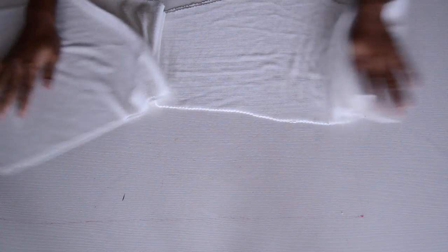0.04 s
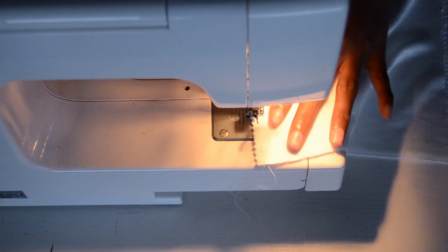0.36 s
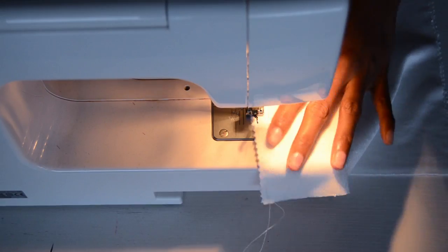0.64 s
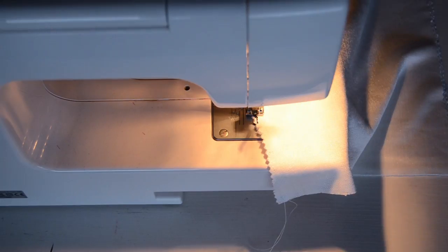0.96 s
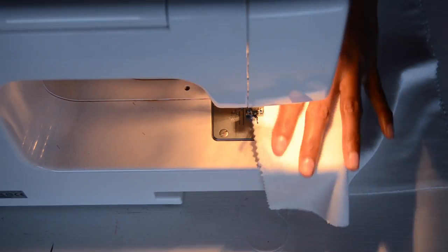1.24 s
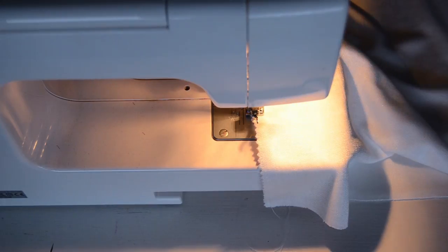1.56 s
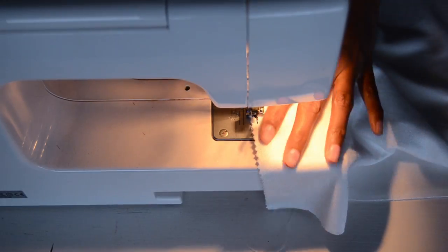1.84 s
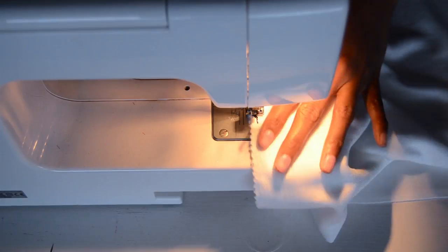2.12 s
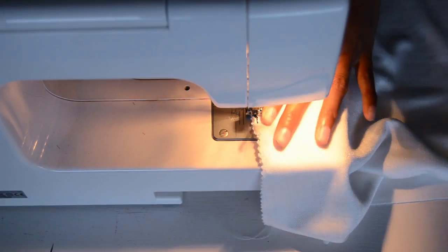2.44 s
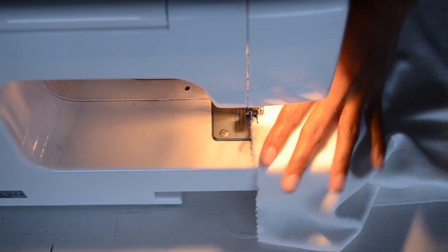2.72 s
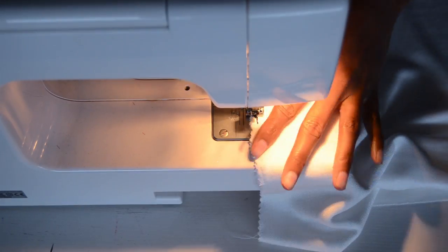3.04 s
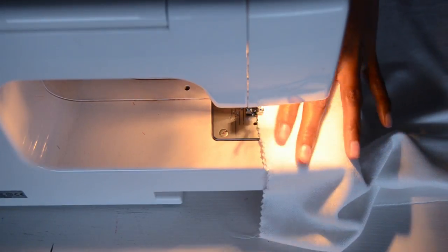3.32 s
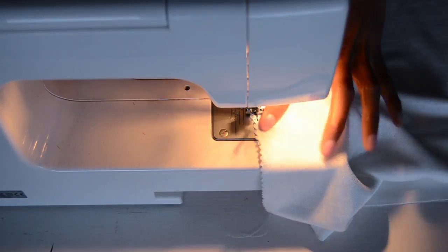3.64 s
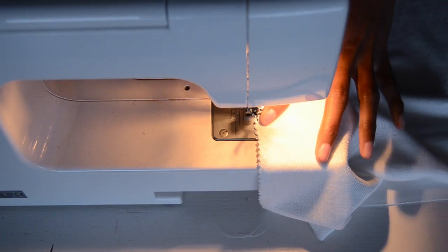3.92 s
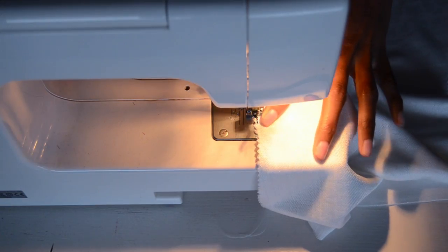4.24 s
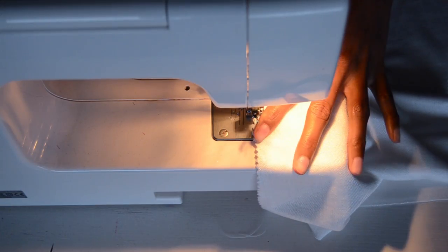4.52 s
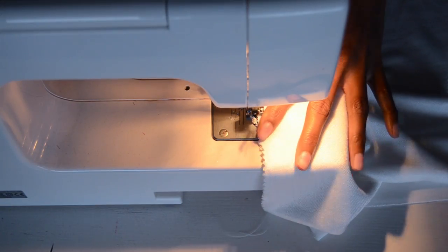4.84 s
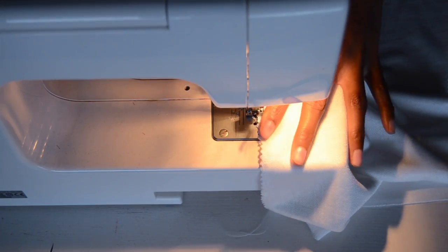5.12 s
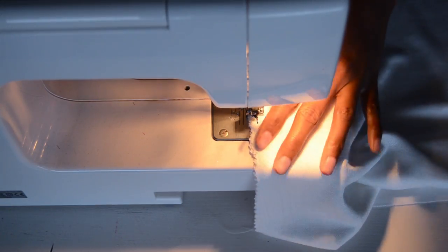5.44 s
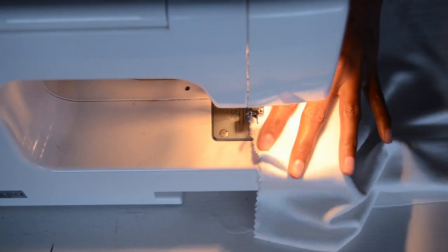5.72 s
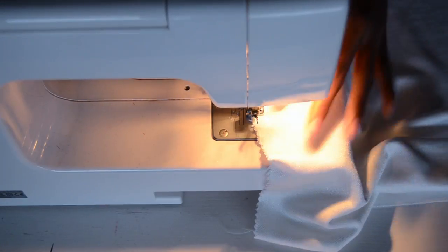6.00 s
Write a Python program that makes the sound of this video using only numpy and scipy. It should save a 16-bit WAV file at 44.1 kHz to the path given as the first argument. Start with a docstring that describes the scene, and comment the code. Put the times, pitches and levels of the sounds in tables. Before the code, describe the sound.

Close, dry swishes of cloth pushed across a tabletop come in two runs, with light snapping folds and faint finger crackle between.

```python
"""You hear stretchy fabric swish over a table in short strokes, up close, in a small dry room.
Each stroke is a swarm of tiny clicks from slipping threads, and the table rings softly underneath.
Between strokes, folds tick and snap as they let go, and the resting fingers make a faint crackle.
A soft boom and dull room noise open the scene; from the first stroke on, the background is
a faint hiss with a thin electrical whine and a low hum."""
import sys
import numpy as np
from scipy import signal
from scipy.fft import rfft, irfft
from scipy.io import wavfile

SR = 44100
rng = np.random.default_rng(int(sys.argv[2]) if len(sys.argv) > 2 else 0)


def generate_wav(signal):
    """Clip the signal to [-1, 1] and save it as 16-bit WAV at the path in sys.argv[1]."""
    frames = np.transpose(np.atleast_2d(signal))
    scaled = np.clip(frames, -1, 1) * 32767
    pcm = np.round(scaled).astype(np.int16)
    wavfile.write(sys.argv[1], SR, pcm)


N = 276418
TIME = np.arange(N) / SR

# pushes of the hand: start/s, length/s, relative level at full speed/dB, quieter on landing by/dB,
# speeding up/s, quieter on lifting by/dB, slowing down/s
STROKES = [(0.405, 0.17, -22.5, 5, 0.074, 16.5, 0.07), (0.576, 0.21, -22.4, 10.5, 0.087, 20.5, 0.061),
           (1.105, 0.28, -22.5, 10.5, 0.12, 16, 0.07), (1.858, 0.22, -23, 10, 0.098, 18.5, 0.065),
           (2.102, 0.4, -22.5, 9.5, 0.11, 22.5, 0.089), (2.588, 0.24, -23.1, 9.5, 0.092, 21.5, 0.071),
           (2.991, 0.14, -23.5, 9, 0.098, 17, 0.066), (4.79, 0.11, -19.5, 16.5, 0.081, 23.5, 0.081),
           (4.974, 0.14, -20.5, 11, 0.16, 21.5, 0.043), (5.185, 0.19, -22.5, 6.5, 0.11, 22.5, 0.085),
           (5.413, 0.27, -21.5, 11.5, 0.12, 20.5, 0.078), (5.721, 0.16, -21.5, 12.5, 0.092, 16.5, 0.1)]
# the resting fingers shift their hold: start/s, length/s, crackle level/dB, relative tick level/dB
FINGER_SHIFTS = [(3.219, .44, -60, -41.5), (3.723, .06, -51, -42), (3.924, .16, -60, -45),
                 (4.186, .14, -53.5, -42), (4.332, .42, -68, -47)]
# tone of the fabric's hiss: f/Hz, relative level/dB
WEAVE_TONE = [(1400, -22.5), (1680, -19.5), (1800, -5), (2050, 1), (2450, -0.5), (2650, -4.5), (4000, -5),
              (5000, -9.5), (7000, -10), (8400, -10.5), (11500, -9), (12600, -14.5), (15700, -14)]
# peaks and dips in that hiss: f/Hz, width/Hz, boost/dB
WEAVE_PEAKS = [(2130, 73, -1), (3120, 83, 1), (3526, 210, 6.5), (3845, 144, 5.5), (4210, 117, 5.5),
               (4850, 190, 4.5), (5645, 350, 7.5), (6060, 480, 4), (6830, 390, 8.5), (7800, 410, 5),
               (9210, 300, 6.5), (10290, 330, 8), (14100, 180, 6), (13980, 160, -5), (15200, 270, -21)]
# tone of the table's low ring under the cloth: f/Hz, relative level/dB
TABLE_TONE = [(60, -42), (160, -23.5), (250, -22), (400, -9.5), (520, -4), (660, -5.5), (900, -6),
              (1200, -0.5), (1450, 0), (1650, -18), (1900, -23)]


def fabric_strokes():
    """The sliding cloth hisses and makes the table ring: smooth when fast, grainy when slow."""
    # the table's resonances under a light touch: f/Hz, width/Hz, boost/dB
    light_peaks = [(600, 61, 12.5), (730, 120, 7), (1000, 30, -14), (1334, 110, 11.5)]
    # its resonances under a firm hand: f/Hz, width/Hz, boost/dB
    firm_peaks = [(293, 17, 9), (454, 24, 4), (528, 69, 6), (754.5, 63, 19.5), (891, 39, 9),
                  (1022, 49, 10.5), (1181, 72, 8), (1335, 130, 12), (1550, 26, 14.5)]
    touch_s, bear_down_s, ramp_curve = 0.0036, 0.0573, 1.38
    rub, press, landed = np.zeros((3, N))
    judder_db = 3 * wander(rate_hz=45)  # the slowing hand drags the cloth in small jerks
    for start, length, level_db, landing_db, rise_s, lifting_db, fall_s in STROKES:
        t = np.arange(0, length, 1 / SR)
        starting, stopping = np.clip([1 - t / rise_s, 1 - (length - t) / fall_s], 0, 1) ** ramp_curve
        jerks_db = stopping * np.interp(start + t, TIME, judder_db)
        stroke_db = level_db - landing_db * starting - lifting_db * stopping + jerks_db
        level = np.minimum(t / touch_s, 1) * amp(stroke_db)
        table_db = -17 + 5.5 * np.exp(-t / 0.028)  # the table rings more as the hand lands
        add(rub, start, level)
        add(press, start, level * amp(table_db))
        add(landed, start, np.minimum(t / bear_down_s, 1) ** 3)
    speed = np.clip(rub / amp(-24), 0, 1)  # 0 is still, 1 is fast
    # the cloth sticks and slides in clumps of a few milliseconds, more so when slow
    clump_db = 2.4 - 1.11 * speed
    clumps = amp(clump_db * wander(rate_hz=153) - clump_db ** 2 * np.log(10) / 20)
    fast = np.sqrt(speed) * friction(per_s=9000, spread_db=2.5)
    slow = np.sqrt(1 - speed) * friction(per_s=2800, spread_db=3.5)
    weave = ring(rub * clumps * (fast + slow), WEAVE_TONE, WEAVE_PEAKS)
    # the table's note changes as the hand bears down
    firmness = np.minimum(landed, 1) * np.clip(2 * speed, 0, 1) ** 2
    light_slips = np.sqrt(1 - firmness) * slips(per_s=5000, spread_db=3.5)
    firm_slips = np.sqrt(firmness) * slips(per_s=5000, spread_db=-0.5)
    light_ring = ring(press * clumps * light_slips, TABLE_TONE, light_peaks)
    firm_ring = ring(press * clumps * firm_slips, TABLE_TONE, firm_peaks)
    return amp(-0.2) * weave + amp(-1.3) * light_ring + amp(-0.07) * firm_ring


def slips(per_s, spread_db):
    """Threads let go in clicks at random moments; spread_db sets how much their sizes vary."""
    size = amp(spread_db * np.minimum(rng.exponential(1, N), 3))
    return normalise(size * rng.choice([-1, 1], N) * (rng.random(N) < per_s / SR))


def friction(per_s, spread_db):
    """Coarse yarns make dull clicks, fine fibres bright ones; the biggest catches are both."""
    coarse = split(slips(per_s, spread_db), cross_hz=4950)[0]
    fine = split(slips(per_s, spread_db), cross_hz=4630)[1]
    return normalise(coarse + fine + 0.79 * slips(per_s / 4, spread_db))


def fold_snaps():
    """A fold lets go: a flurry of slips, a brief note from the taut fold, and a flick on the table."""
    # the main snaps: t/s, relative level/dB, relative table ring/dB, relative treble/dB, fold's f/Hz
    main_snaps = [(0.4061, -15, -20, -11, 5630), (0.786, -22.5, -30, -23, 2020), (0.793, -28, -30, 1, 4040),
                  (1.3732, -22, -32, -9, 4270), (1.3948, -24, -9, -4.5, 3200), (1.42, -35, -9, -24, 2020),
                  (1.8188, -38.5, -23, -8, 1770), (1.8509, -27, -26, -27, 2170),
                  (2.079, -24, -23, -28, 2240), (2.827, -26, -27, -3, 3460), (3.1367, -31, -4, -13, 3600),
                  (3.156, -29, -22, -15, 1980), (3.2333, -43.5, -12, -1, 5300),
                  (3.2915, -33, -7.5, -6.5, 1930), (3.329, -25.5, -14.5, -18, 3440),
                  (3.414, -28.5, -21, -18, 3200), (3.463, -37, -25, -15, 1960),
                  (3.7109, -22, -36, -5.5, 3030), (3.9459, -36.5, -15, -12, 5530),
                  (3.9694, -34.5, -17, -19, 2030), (4.0628, -41, -7.5, -10, 5130),
                  (4.194, -31, -25, -12, 3900), (4.226, -28, -14.5, -8, 5590),
                  (4.2474, -41, -28, 15.5, 5800), (4.2742, -18, -24.5, -14.5, 2470),
                  (4.281, -25, -22, -19, 3170), (4.3115, -34.5, -21, -28, 1990),
                  (4.3849, -38, -16, -25, 2010), (4.7036, -29.5, -8, -20, 2930),
                  (4.7107, -29, -26, -7, 4500), (4.9222, -30, -28, -12, 3520),
                  (4.9485, -30, -37, -19, 3760), (4.9643, -19.5, -25, -3.5, 3200),
                  (4.9766, -16.5, -29, -1, 2010), (5.1168, -25, -27, -13, 5480),
                  (5.1271, -19, -19, -1.5, 4050), (5.3902, -32, -16, -20, 2060),
                  (5.6773, -28, -29, -7, 3520), (5.69, -30.5, -10, -3, 3150),
                  (5.7192, -24.5, -18, -11, 2400), (5.9853, -33.5, -20, -22, 2990),
                  (6.106, -37, -34, -3.5, 3280)]
    # the table's resonances when a fold flicks it: f/Hz, width/Hz, boost/dB
    flick_peaks = [(435, 80, 2.5), (790, 120, 13.5), (1000, 75, 9), (1410, 120, 7)]
    weave, table, notes = np.zeros((3, N))
    t = np.arange(SR // 10) / SR
    attack = 1 - np.exp(-t / 0.00062)
    noise = rng.choice([-1, 1], N + len(t))
    for start, level_db, table_db, treble_db, hz in main_snaps + small_snaps():
        shape = attack * decay(t, fade_s=0.018 + 0.068 * amp(table_db))  # harder flicks last longer
        flurry = amp(level_db - 10) * shape / shape.max() * noise[round(start * SR):][:len(t)]
        dull, bright = split(flurry, cross_hz=5900)
        note = attack * decay(t, fade_s=0.02) * np.sin(2 * np.pi * hz * t)
        add(weave, start, dull - amp(treble_db + 7.5) * bright)
        add(table, start, amp(table_db + 3) * flurry)
        add(notes, start, amp(level_db - 4) * note)
    weave = split(ring(weave, WEAVE_TONE, WEAVE_PEAKS), cross_hz=14600)[0]
    return weave + notes + ring(table, TABLE_TONE, flick_peaks)


def small_snaps():
    """Folds catch as each stroke comes to rest, and tick while the fingers shift."""
    rows = []
    for start, length, *_ in STROKES:
        rows += ticks(start + length - 0.04, length=0.053, per_s=45, relative_db=-32)
    for start, length, _, tick_db in FINGER_SHIFTS:
        rows += ticks(start, length, per_s=14, relative_db=tick_db)
    return rows


def ticks(start, length, per_s, relative_db):
    """Lists small snaps scattered unevenly over a stretch of time, as rows for fold_snaps."""
    scatter_db, table_db, treble_db, low_hz, high_hz = 7, -22, -12.5, 1840, 4450
    count = max(round(length * per_s), 1)
    jitter, size, pitch = rng.random((64, 3))[:count].T
    times = start + length * (np.arange(len(jitter)) + jitter) / count
    levels_db = relative_db + scatter_db * (2 * size - 1)
    pitches_hz = low_hz * (high_hz / low_hz) ** (pitch ** 2)
    return [(t, db, table_db, treble_db, hz) for t, db, hz in zip(times, levels_db, pitches_hz)]


def finger_crackle():
    """Sparse, dull slips of the cloth swell and fade with each shift of the fingers."""
    level = np.zeros(N)
    for start, length, crackle_db, _ in FINGER_SHIFTS:
        add(level, start, amp(crackle_db) * signal.windows.tukey(round(length * SR)))
    dull = split(level * friction(per_s=620, spread_db=6.0), cross_hz=7000)[0]
    return ring(dull, WEAVE_TONE, WEAVE_PEAKS)


def room(x, fade_s, echo_db):
    """Nearby surfaces add a short, weak tail of echoes to x."""
    t = np.arange(SR // 4) / SR
    echoes = rng.standard_normal(len(t)) * (rng.random(len(t)) < .1)
    echoes *= (t > .003) * decay(t, fade_s)
    return x + amp(echo_db) * signal.oaconvolve(x, echoes / np.linalg.norm(echoes))[:len(x)]


def soft_boom(hz, level_db, fade_s):
    """A low tone that dies away at the very start."""
    return amp(level_db) * np.exp(-(TIME / fade_s) ** 2) * np.sin(2 * np.pi * hz * TIME)


def electrical_whine():
    """Thin, high tones that hold their pitch."""
    # the tones of the whine: f/Hz, relative level/dB
    tones = [(1776, -75), (2030, -74.5), (3553, -75), (3806, -78), (5329, -69.5), (5582, -77), (6089, -77),
             (7101, -75), (9130, -82), (10148, -76), (12177, -80), (13189, -80)]
    drifting_time = TIME + np.cumsum(0.00012 * wander(rate_hz=3.3)) / SR
    return sum(amp(db + 3.5) * sine(hz * drifting_time + rng.random()) for hz, db in tones)


def low_hum(centre_hz, steady_hz, settles_at_s, settled_for_s):
    """A wavering hum that swells once and settles for a moment on one pitch."""
    pitch_hz = centre_hz + 9 * wander(rate_hz=7.27)
    flutter = normalise(1 + .5 * wander(rate_hz=27))
    level = amp(-82.5 + 2.5 * wander(rate_hz=1.7))
    wavering = level * flutter * sine(np.cumsum(pitch_hz) / SR)
    steady = amp(-73.5) * sine(steady_hz * TIME)
    settled = np.exp(-(2 * (TIME - settles_at_s) / settled_for_s) ** 2)
    return (1 - settled) * wavering + settled * steady


def background(first_stroke_s):
    """Dull room noise until the first stroke; then hiss, whine and hum."""
    # tone of the room noise and of the hiss: f/Hz, relative level/dB
    room_tone = [(25, -16), (75, -17), (110, -13), (330, -7.5), (400, -15), (500, -10.5), (1100, -7),
                 (1350, -13.5), (2100, -18), (2500, -24), (3500, -29), (6000, -35), (13500, -34)]
    hiss_tone = [(25, -27), (75, -16), (200, -15), (450, -9), (900, -3), (2400, -3.5), (3000, -0.5),
                 (4600, -1), (7200, -1), (8000, -5.5), (11300, -6.5), (12000, -12), (13400, -10)]
    # the peaks in each: f/Hz, width/Hz, boost/dB
    room_peaks = [(477, 32, 9.5), (873, 28, 8.5), (1690, 24, 13)]
    hiss_peaks = [(602, 10, 4.6), (712, 15, 4.1), (982, 28, 8.8), (2864, 79, 8.1), (5330, 370, 6.3),
                  (9700, 170, 3)]
    room_noise = amp(-53) * ring(rng.standard_normal(N), room_tone, room_peaks)
    hiss = amp(-56) * ring(rng.standard_normal(N), hiss_tone, hiss_peaks)
    whine = electrical_whine()
    hum = low_hum(centre_hz=117.5, steady_hz=106, settles_at_s=4.25, settled_for_s=0.63)
    return low_pass(np.where(TIME < first_stroke_s, room_noise, hiss + whine + hum), edge_hz=13500)


def amp(db):
    """Turns decibels into a factor to multiply by."""
    return 10 ** (np.asarray(db) / 20)


def normalise(x):
    """Scales x to an average power of 1."""
    return x / np.sqrt(np.mean(x ** 2) + 1e-20)


def sine(cycles):
    """A pure tone with an average power of 1."""
    return np.sqrt(2) * np.sin(2 * np.pi * cycles)


def decay(t, fade_s):
    """A fade that drops by 60 dB in fade_s seconds."""
    return np.exp(-np.log(1000) * t / fade_s)


def wander(rate_hz):
    """Random wavering, up to about rate_hz times a second."""
    hz = np.fft.rfftfreq(N, 1 / SR)
    return normalise(irfft(rfft(rng.standard_normal(N)) / (1 + (hz / rate_hz) ** 4), N))


def add(mix, start_s, sound):
    """Mixes a sound in at the given time."""
    part = mix[max(round(start_s * SR), 0):][:len(sound)]
    part += sound[:len(part)]


def split(x, cross_hz):
    """Returns the dull part of x (below cross_hz) and the bright part (above it)."""
    return [signal.lfilter(*signal.butter(2, cross_hz, kind, fs=SR), x) for kind in ("low", "high")]


def low_pass(x, edge_hz):
    """Steeply cuts everything above edge_hz."""
    return signal.oaconvolve(x, signal.firwin(511, edge_hz, window=("kaiser", 9), fs=SR), "same")


def ring(x, tone, peaks):
    """Filters x so that it takes on a broad tone with ringing peaks on top."""
    size = 4096
    hz = abs(np.fft.fftfreq(size, 1 / SR))
    tone_hz, tone_db = np.transpose(tone)
    db = np.interp(np.log(hz + 1), np.log(tone_hz), tone_db)
    db += sum(boost / (1 + (2 * (hz - f) / width) ** 2) for f, width, boost in peaks)
    # the level falls away beyond the tone's lowest and highest points
    outside = np.maximum(tone_hz[0] / (hz + 1), 1) * np.maximum(hz / tone_hz[-1], 1)
    log_gain = np.log(np.maximum(amp(db) / outside ** 2, 1e-5))
    # minimum phase: the ringing comes after each click, never before
    response = np.fft.ifft(np.exp(np.conj(signal.hilbert(log_gain)))).real[:size // 2]
    return signal.oaconvolve(x, response / np.linalg.norm(response))[:len(x)]


def scene():
    """Snaps, strokes and crackle in a small room, over the background, in one channel."""
    cloth = fold_snaps() + fabric_strokes() + finger_crackle()
    mix = room(cloth, fade_s=0.099, echo_db=-16.5) + background(first_stroke_s=0.406)
    mix += soft_boom(hz=122, level_db=-42.5, fade_s=0.072)
    return mix[None]


def record(dry):
    """Cuts the highest treble and adds a tiny constant offset."""
    return low_pass(dry[0], edge_hz=15850)[None] + 0.00064


dry = scene()
out = record(dry)
generate_wav(out)
```